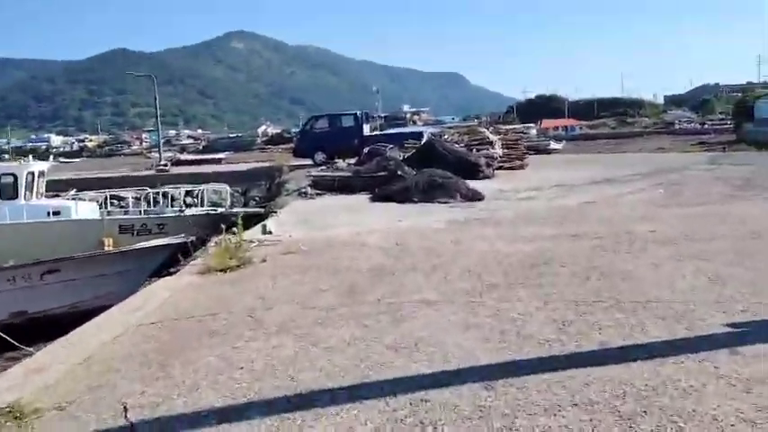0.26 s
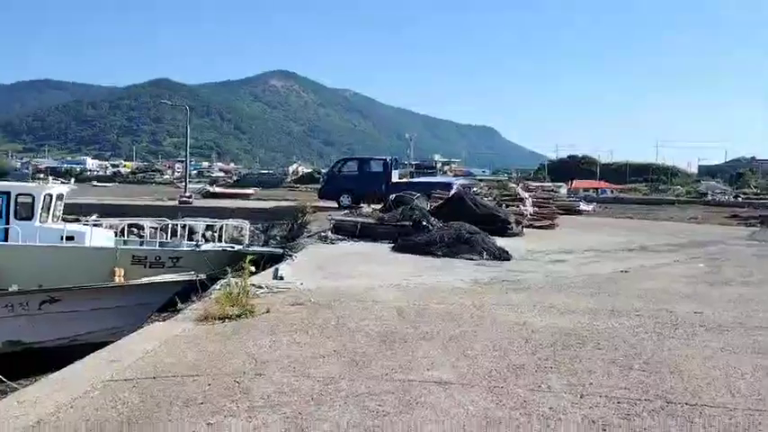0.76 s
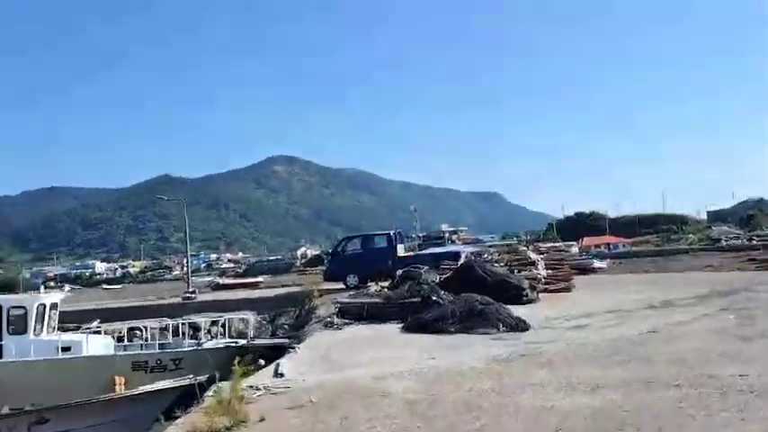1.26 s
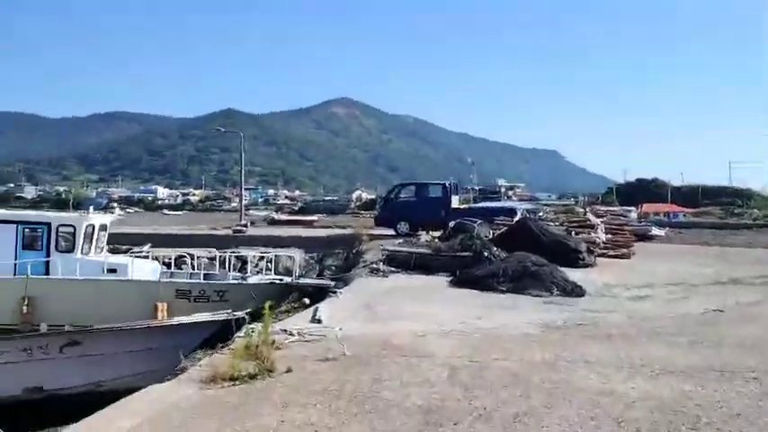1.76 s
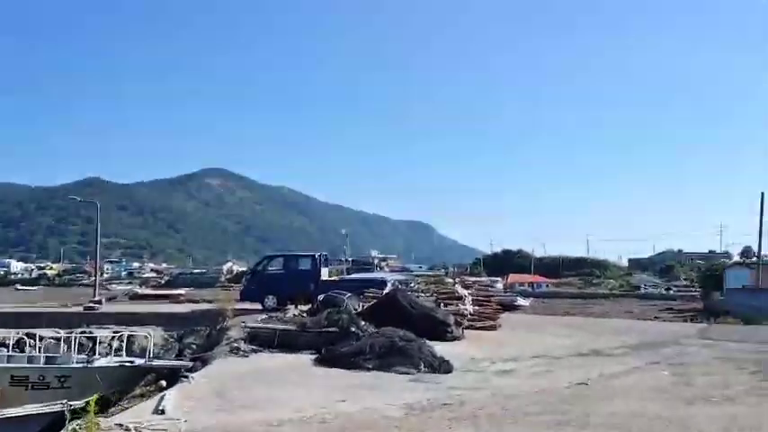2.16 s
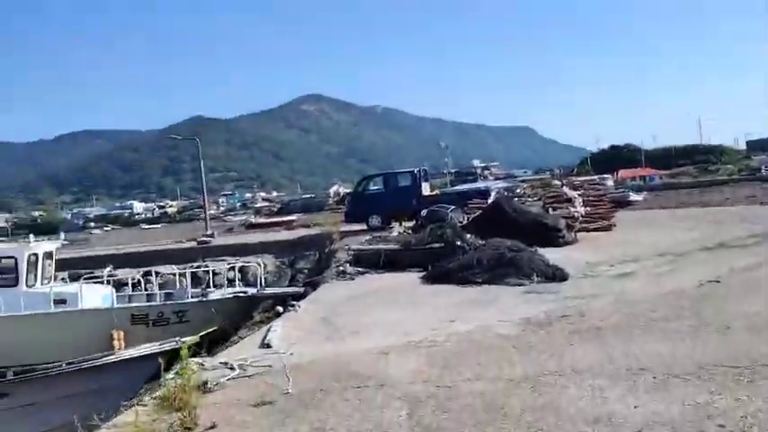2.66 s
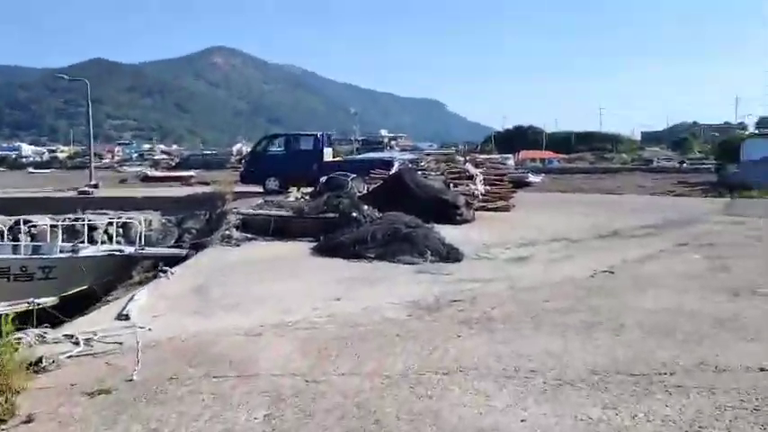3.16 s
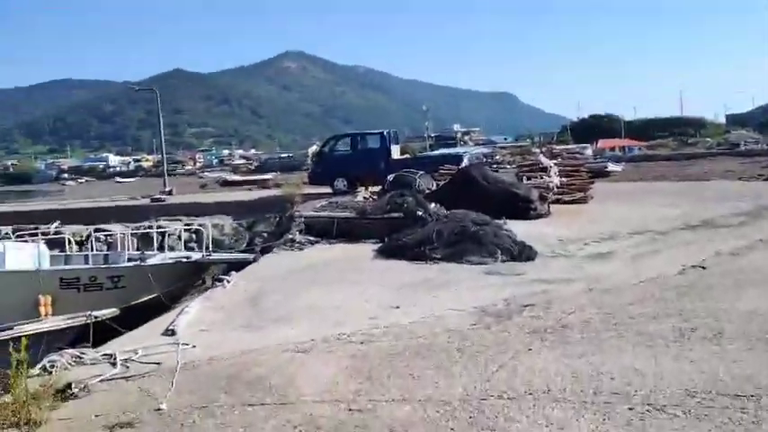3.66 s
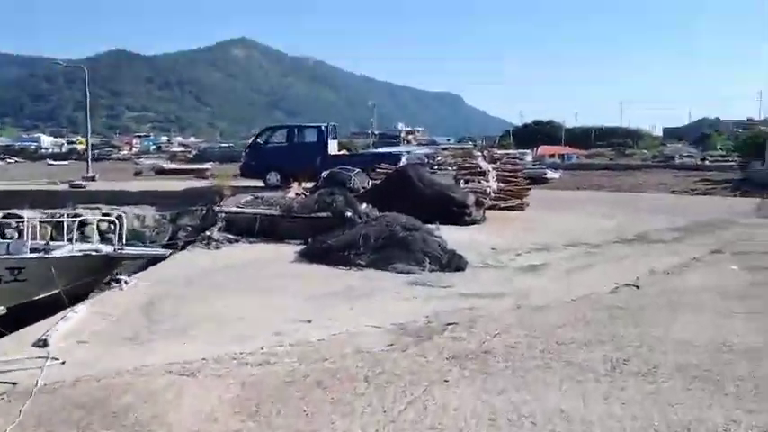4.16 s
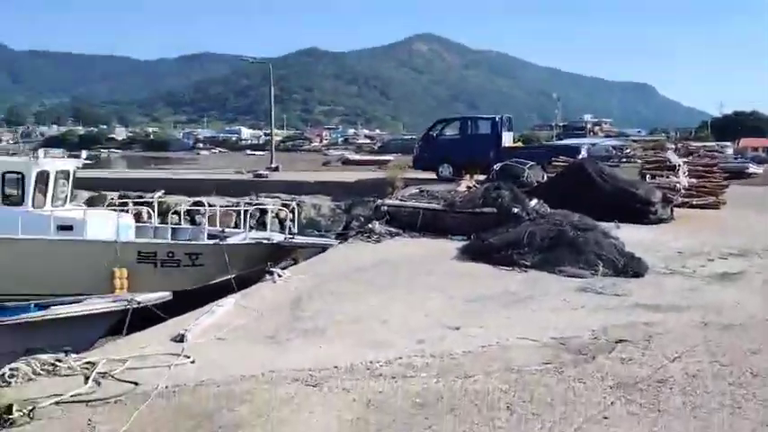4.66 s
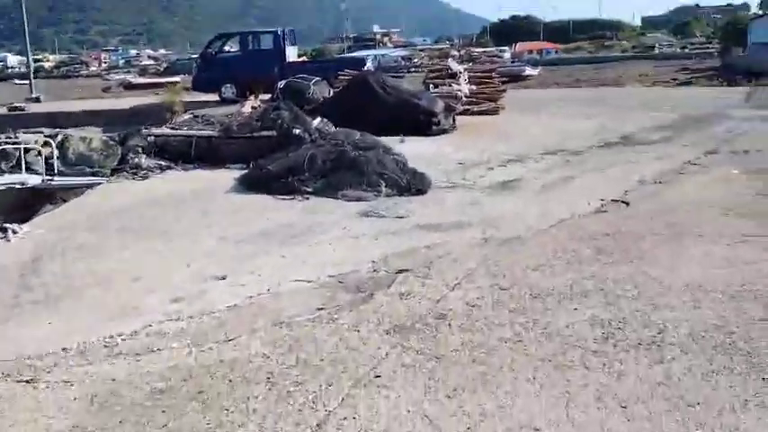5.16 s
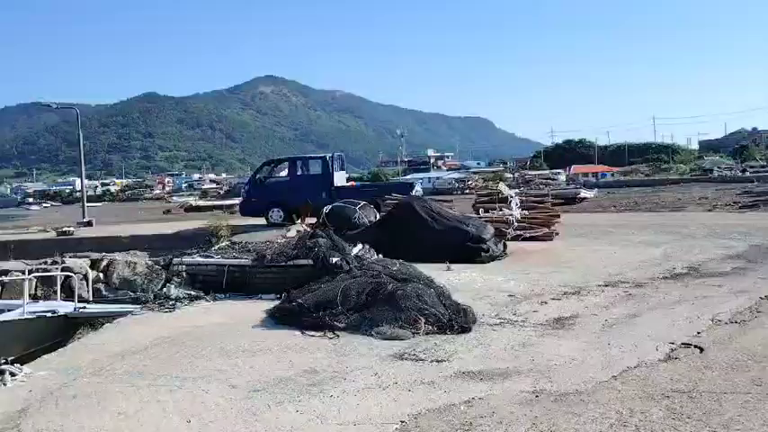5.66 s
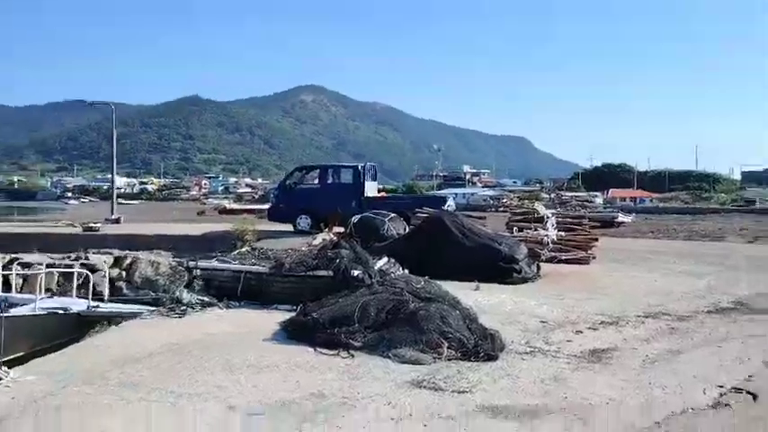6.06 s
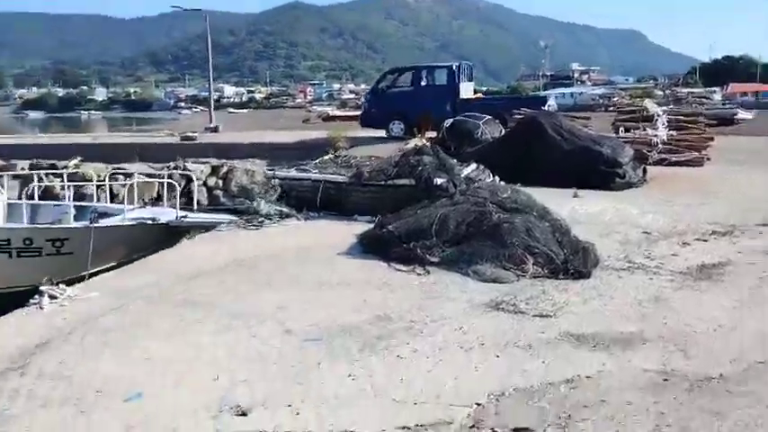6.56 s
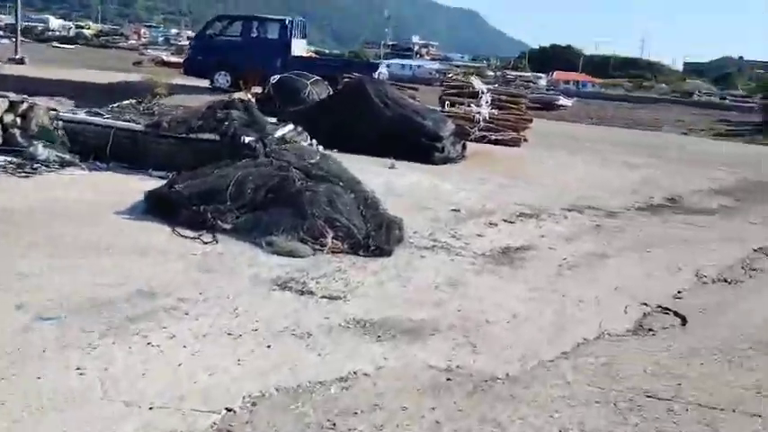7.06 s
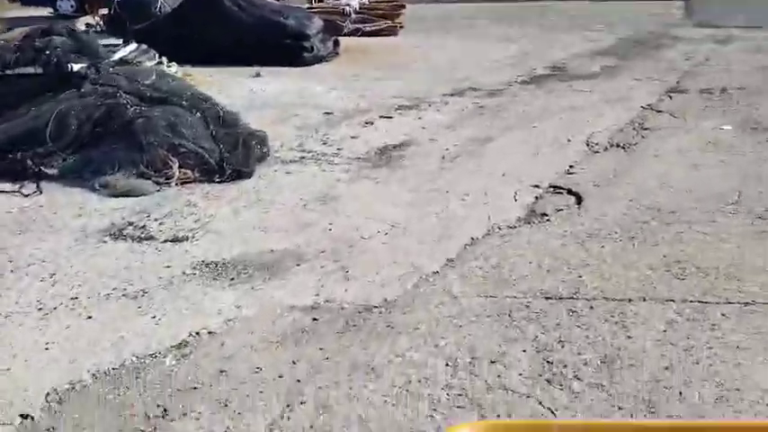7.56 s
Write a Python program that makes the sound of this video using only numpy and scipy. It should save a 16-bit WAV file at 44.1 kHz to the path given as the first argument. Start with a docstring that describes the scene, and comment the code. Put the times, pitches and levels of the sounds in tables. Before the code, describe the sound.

A plastic-tub wheelbarrow rumbles over rough concrete outdoors, its hollow tub drumming low while the frame and loose steel parts knock, rattle and clink irregularly.

```python
"""A plastic-tub wheelbarrow on rough concrete, just below a hand-held phone: the wheel shakes the tub,
whose modes drum low; each bounce booms at its own low pitch. Frame and loose steel parts chatter and
knock as shaped noise, and each knock adds short hollow rings. The axle squeaks very high now and then as
hiss with arching whistles; two sharp noise ticks fall near the end. Outdoor hiss and air rumble are faint."""
import sys
import numpy as np
from scipy import signal
from scipy.fft import rfft, irfft, next_fast_len
from scipy.io import wavfile
from scipy.ndimage import uniform_filter1d, map_coordinates

SR = 44100
rng = np.random.default_rng(int(sys.argv[2]) if len(sys.argv) > 2 else 0)


def wav_record(signal):
    """Record a signal, one row per channel, as 16-bit PCM in the file named by sys.argv[1]."""
    frames = np.transpose(np.atleast_2d(signal))
    bounded = np.clip(frames, -1, 1)
    # unit amplitude maps onto the largest positive 16-bit level
    quanta = np.round(bounded * 32767).astype(np.int16)
    wavfile.write(sys.argv[1], SR, quanta)


def rack_gain(trim_db):
    """Turn a fader trim in dB into the linear factor to multiply a signal by."""
    fader = np.asarray(trim_db, float)
    return 10 ** (fader / 20)


N = 343980


def unit(x):
    """Scales to rms 1."""
    return x / np.sqrt(np.mean(x ** 2) + 1e-20)


def along(points, hz):
    """Interpolates (hz, value) points on a log-frequency axis."""
    points_hz, values = np.transpose(points)
    return np.interp(np.log(hz + 1), np.log(points_hz + 1), values)


def wobble(rate_hz):
    """Smooth random curve, rate_hz knots a second."""
    knots = rng.standard_normal(int(N * rate_hz / SR) + 4)
    return map_coordinates(knots, [np.arange(N) * rate_hz / SR])


def filtered(x, response):
    """Applies a complex frequency response."""
    size = next_fast_len(N + 8192)
    return irfft(rfft(x, size) * response(np.fft.rfftfreq(size, 1 / SR)), size)[..., :N]


def noise(spectrum):
    """Two unrelated smooth noises, joint rms 1, with this colour."""
    return unit(filtered(rng.standard_normal((2, N)), lambda hz: rack_gain(along(spectrum, hz))))


def patchy(spectrum, patchy_db):
    """Two unrelated coloured noises; patches of pitch swell and fade as different parts ring."""
    white = rng.standard_normal((2, N), dtype=np.float32)
    hz, _, z = signal.stft(white, SR, nperseg=512)
    field = uniform_filter1d(rng.standard_normal(z.shape[1:]), size=3, axis=0)
    field = uniform_filter1d(field, size=5, axis=1)
    gain_db = along(spectrum, hz)[:, None] + patchy_db * unit(field)
    return unit(signal.istft(z * rack_gain(gain_db), nperseg=512)[1][:, :N])


def jolts(rate_hz, spread_db, t60_s, rise_s):
    """Envelope of rms 1: small random contacts that swell and die fast, a few far stronger."""
    strength_db = spread_db * np.minimum(rng.exponential(size=N), 4)
    kicks = (rng.random(N) < rate_hz / SR) * rack_gain(strength_db) ** 2
    power = signal.lfilter([1], [1, -rack_gain(-120 / (t60_s * SR))], kicks)
    return unit(np.sqrt(np.abs(uniform_filter1d(power, round(rise_s * SR) + 1)) + 1e-9))


def blows(times_s, levels_db, t60_s, attack_s, crack_db):
    """Envelope of many blows: fast rise, short crack, rattle that holds then falls; powers add."""
    power, t = np.zeros(N + SR), np.arange(SR // 3) / SR
    rattle = rack_gain(-60 * (t / t60_s) ** 1.54) ** 2
    crack = rack_gain(crack_db - 60 * t / 0.049) ** 2
    shape = (1 - np.exp(-t / attack_s)) ** 2 * (rattle + crack)
    for start_s, level_db in zip(times_s, levels_db):
        power[round(start_s * SR):][:len(t)] += rack_gain(level_db) ** 2 * shape
    return np.sqrt(power[:N])


def low_cut(hz):
    """Keeps deep bass out of the tub sounds: fourth-order slope below 85 Hz."""
    return (1j * hz / 85) ** 4 / (1 + (hz / 85) ** 8) ** .5


def outdoors():
    """Faint outdoor hiss, uneven over pitch and time."""
    spectrum = [(200, -56.5), (500, 15), (2500, -12.5), (4000, -36), (7500, 0), (9000, -44), (11000, -82)]
    return rack_gain(-56.5) * patchy(spectrum, patchy_db=11.0)


# low air rumble: hz, density_db (dB per Hz)
AIR = [(12, -28), (22, -10.5), (55, -13.5), (70, 1), (90, -41.5)]


def air(shudder):
    """Low air rumble that follows the shuddering tub, with a slow random level."""
    return rack_gain(-64 + 2.5 * wobble(7)) * shudder * noise(AIR)


# snaps of grit: start_s, level_db (relative)
TICKS = [(7.6001, -17.5), (7.6893, -10.5)]


def ticks():
    """A grain of grit snaps: a noise burst, wide in pitch, that falls 60 dB in 4.6 ms."""
    burst, t = np.zeros(N + SR), np.arange(SR // 50) / SR
    for start_s, level_db in TICKS:
        burst[round(start_s * SR):][:len(t)] += rack_gain(level_db - 3.5 - 60 * t / 0.0046)
    return burst[:N] * noise([(800, -49), (2000, 7), (8000, 4.5), (13000, -14), (16000, -10.5)])


# axle squeaks: start_s, length_s, level_db
SQUEAKS = [(0.345, 0.035, -81), (3.772, 0.2, -53.5), (4.004, 0.041, -56), (4.428, 0.12, -55),
           (5.366, 0.15, -58), (5.574, 0.039, -54), (7.168, .055, -61), (7.734, 0.059, -60)]


def squeaks():
    """Dry axle: a hiss that swells, with thin whistles that arch up and down in it."""
    swell, whistles = np.zeros(N + SR), np.zeros((2, N + SR))
    for (start_s, length_s, level_db), draws in zip(SQUEAKS, rng.random((len(SQUEAKS), 8, 3))):
        u = np.linspace(0, 1, round(length_s * SR))
        start, shape = round(start_s * SR), rack_gain(level_db) * np.sin(np.pi * u) ** 0.85
        arch = 1 - 0.87 * (u - .3 - .4 * draws[:, 1:2]) ** 2
        hz = (12000 + 2800 * draws[:, :1]) * arch
        gate = np.exp(-((u - .3 - .5 * draws[:, 2:]) / 0.11) ** 2)
        tones = gate * np.sin(2 * np.pi * np.cumsum(hz, axis=1) / SR)
        pair = [tones[::2].sum(axis=0), tones[1::2].sum(axis=0)]
        swell[start:][:len(u)] += shape
        whistles[:, start:][:, :len(u)] += rack_gain(-1) * shape * pair
    hiss = noise([(8500, -37), (10500, -4.5), (13500, 1.5), (15300, -1), (16200, -39.5)])
    return swell[:N] * hiss + whistles[:, :N]


def rolling(dips, swing_db, base_db, follows, after):
    """Level of rolling chatter: a share of the ground's swing, plus the rattle after blows."""
    return dips * np.hypot(rack_gain(base_db + follows * swing_db), after)


RATTLE_DB, RATTLE_T60_S = -15.5, 0.14  # loose parts rattle on after a blow; dB relative to it
# loose steel blows: start_s, level_db (relative), sizzle_db (re level_db)
CLINKS = [(0.068, -35, -29), (0.156, -17.5, -23), (0.3506, -19, -46), (0.4075, -52, -35), (0.629, -42, -27),
          (0.7008, -23, -21), (0.74, -34, -19), (0.7726, -40, -35), (0.8255, -48, -32), (1.073, -28.5, -36),
          (1.1034, -29, -22), (1.1199, -21, -32), (1.174, -28, -21), (1.2361, -37, -26), (1.4217, -36, -25),
          (1.4426, -31.5, -24), (1.529, -35, -29), (1.6157, -46, -33), (1.6611, -45, -44),
          (1.7065, -47, -41), (1.7579, -39, -18), (1.8477, -40, -44), (2.1844, -41, -34),
          (2.2114, -36, -35), (2.256, -33.5, -33), (2.2857, -43, -32), (2.301, -30, -35),
          (2.3965, -25.5, -39), (2.4328, -20.5, -27), (2.4916, -23, -19.5), (2.541, -49, -24),
          (2.5775, -36, -18), (2.598, -32, -22), (2.666, -37, -35), (2.6923, -31, -27), (2.731, -35, -35),
          (2.7472, -27, -20), (2.82, -38, -22), (2.888, -34, -26), (2.9597, -39, -22), (2.9831, -34, -27),
          (3.0225, -35, -26), (3.0405, -26.5, -32), (3.0999, -28, -27), (3.1276, -29, -18),
          (3.1552, -43, -23), (3.1692, -31, -21), (3.1921, -26, -19), (3.267, -20, -18.5),
          (3.3129, -37, -25), (3.3424, -31, -33), (3.4032, -29.5, -23), (3.4288, -15.5, -23),
          (3.474, -28, -33), (3.576, -32, -32), (3.712, -47, -33), (3.7194, -39, -27), (3.798, -33.5, -34),
          (3.8671, -34.5, -25), (3.881, -31, -28), (3.9916, -36, -22), (4.115, -35, -31), (4.134, -27, -28),
          (4.179, -25, -24), (4.2003, -23, -24), (4.2525, -36, -12), (4.2677, -21.5, -17),
          (4.3206, -30, -21), (4.353, -24.5, -32), (4.394, -21.5, -17), (4.475, -25.5, -30),
          (4.5237, -29.5, -20), (4.6069, -46, -36), (4.6284, -25.5, -36), (4.667, -30, -35),
          (4.6838, -28, -34), (4.7446, -35, -29), (4.7596, -27, -27), (4.782, -26.5, -24),
          (4.82, -25.5, -25), (4.884, -24.5, -21), (4.9873, -35, -32), (5.0315, -20, -40),
          (5.1153, -37, -33), (5.2071, -42, -39), (5.3084, -23.5, -31), (5.394, -34.5, -24),
          (5.4515, -24, -25), (5.5355, -19, -32), (5.5697, -25, -26), (5.6198, -25, -21), (5.643, -36, -19),
          (5.661, -31, -21), (5.694, -30.5, -25), (5.8192, -18.5, -19), (5.8213, -18.5, -25),
          (5.8895, -27.5, -27), (5.956, -33, -23), (5.9738, -20, -24), (6.007, -28, -21),
          (6.0681, -27, -26), (6.0916, -27.5, -21), (6.1409, -48, -35), (6.1515, -45, -35),
          (6.2413, -15, -19), (6.2916, -23, -23), (6.3365, -23.5, -26), (6.4023, -47, -22),
          (6.4375, -22.5, -29), (6.5031, -35, -34), (6.533, -28, -22), (6.5503, -18.5, -25),
          (6.6343, -21, -22), (6.7096, -26, -24), (6.7766, -33.5, -34), (6.8009, -32.5, -36),
          (7.065, -38, -26), (7.1302, -49, -30), (7.4066, -35, -24), (7.4752, -23.5, -35),
          (7.5328, -37, -20), (7.6016, -44, -13), (7.6226, -32, -17), (7.661, -31, -17), (7.6863, -39, -14)]


def clinks():
    """Envelopes of the steel clinks, of their sizzle and of the tinkle and pings that follow."""
    start_s, level_db, sizzle_db = np.transpose(CLINKS)
    sizzle_db = level_db + sizzle_db
    return (blows(start_s, level_db - 8.5, 0.043, 0.0012, crack_db=5.0),
            blows(start_s, sizzle_db - 3.5, 0.033, 0.0025, crack_db=8.5),
            blows(start_s, level_db + RATTLE_DB + 3.0, RATTLE_T60_S, 0.0042, crack_db=-19),
            blows(start_s, sizzle_db - 10.5, RATTLE_T60_S, 0.012, crack_db=-30))


# brightest steel: hz, density_db (dB per Hz)
SIZZLE = [(5000, -95.5), (7000, -36), (8800, 2), (10300, -1), (13400, -8), (15300, -11), (16300, -92)]


def sizzle(roll, pings, hit):
    """Bright steel noise: rises faster than the rolling; after a clink, single contacts ping."""
    return np.hypot(rack_gain(-7.5) * roll ** 1.5 + pings, hit) * patchy(SIZZLE, patchy_db=2.5)


# loose steel: hz, density_db (dB per Hz)
STEEL = [(2120, -13.5), (3600, -6), (3890, -15.5), (4590, -4.5), (5500, 1.5), (6340, -3.5), (7070, -1),
         (8210, -6), (9200, -22.5), (12000, -72), (20200, -120)]


def steel(roll, hit):
    """Loose steel: patchy noise under the combined power of tinkle and clinks."""
    return np.hypot(roll, hit) * patchy(STEEL, patchy_db=4.0)


# bumps: start_s, knock_db (relative), thud_db (re knock_db), ring_hz, ring_db (re knock_db)
KNOCKS = [(0.0638, -27.5, -6, 1900, -3.5), (0.155, -9, -7, 2110, -7), (0.2862, -34.5, 0, 1330, -1),
          (0.353, -19, -9.5, 1210, -7), (0.4134, -28, -5, 1220, -1), (0.6265, -26.5, -24, 1720, -2.5),
          (0.701, -13.5, -9.5, 1010, -16), (0.7402, -17, -9, 1140, -3), (0.817, -25.5, -4, 1760, -2),
          (1.0742, -28.5, -9, 2210, -7.5), (1.095, -24.5, -12, 1340, -7), (1.1033, -18, -6, 1660, -8.5),
          (1.1166, -21, -3.5, 1650, -4), (1.1752, -17.5, -12, 1140, -5), (1.236, -27, -15, 1330, -4),
          (1.358, -22, -7, 1060, -15), (1.4263, -14.5, -8.5, 1070, -9), (1.4837, -25.5, -1.5, 1250, -5),
          (1.5768, -33.5, -18, 1060, 0), (1.6433, -31, -18, 1230, 2), (1.7664, -37.5, -2, 1680, -19),
          (1.8333, -26, -15, 1160, -5), (2.0886, -49, -5, 1700, -7), (2.1865, -26, -7, 2280, -11),
          (2.2568, -26, -15, 2100, -10), (2.291, -24, -1.5, 1390, -3), (2.301, -24.5, -19, 2100, -6),
          (2.393, -20, -21, 1320, -8), (2.4057, -18.5, -22, 1510, -6), (2.4318, -11, -19, 1420, -13),
          (2.4485, -22.5, -21, 1115, -2), (2.4788, -13.5, -9, 2150, -12.5), (2.4917, -12, -13, 1020, -10),
          (2.5426, -34, -7, 1340, -7), (2.579, -30, -2, 1920, -12), (2.668, -19, -20, 1580, -6.5),
          (2.7288, -20, -4.5, 1120, -4), (2.753, -18.5, -17, 1075, -10), (2.817, -34, 6.5, 1880, -11),
          (2.8328, -26.5, -6, 1710, -1), (2.8853, -23.5, -3, 2300, -8.5), (2.9673, -25, -1.5, 1070, -6),
          (3.02, -17.5, -6, 1360, -20), (3.039, -16.5, -24, 1290, -11), (3.084, -28, -23, 1320, -10),
          (3.0984, -18, -3, 2160, -5.5), (3.1285, -18.5, -5.5, 1210, 1), (3.1567, -17, -2, 1225, -9),
          (3.1906, -11.5, -11.5, 1070, -7), (3.237, -21.5, -3.5, 1170, -7), (3.27, -12.5, -7, 2350, -10.5),
          (3.339, -19.5, -9, 1290, -10), (3.401, -23, -1, 1710, -15), (3.4274, -14, -9, 2640, -13.5),
          (3.475, -15.5, -7.5, 1360, -14), (3.5144, -26, -16, 2400, -9), (3.5372, -40, -10, 1070, -7),
          (3.5783, -26.5, -13, 1300, -2), (3.707, -24, -10, 1240, -3), (3.7945, -23, -3, 1430, 1.5),
          (3.9973, -23.5, -11, 1170, -8), (4.0544, -28.5, -12.5, 1330, -2), (4.1226, -14, -8.5, 1330, -8.5),
          (4.1864, -10.5, -10.5, 1270, -11), (4.2218, -15, -17, 1030, -8), (4.257, -16.5, -3, 1970, -11),
          (4.2722, -9, -31, 1180, -7), (4.338, -32, -10, 1070, -7), (4.355, -17.5, -10, 2050, -6),
          (4.4223, -27.5, -19, 2010, -3), (4.4834, -18, -11.5, 1880, -8), (4.5207, -21, -8.5, 1006, -7),
          (4.6109, -30, -8, 1295, -7), (4.6266, -23.5, -8.5, 1820, -8.5), (4.6745, -15, -17, 1375, -18),
          (4.7577, -16.5, -14.5, 1820, -5), (4.8045, -22.5, -31, 1560, -10),
          (4.826, -12.5, -30, 1590, -4.5), (4.8333, -21, -22, 1690, -2), (4.8783, -16, -13, 1860, -9),
          (4.9338, -18.5, -17, 1230, -9), (4.9494, -25.5, -17, 1760, -7), (5.0333, -17, -36, 1930, -10),
          (5.0644, -24, -29, 1070, -3), (5.1193, -21, -5, 1080, -9), (5.251, -26, -10, 1190, -7),
          (5.293, -42, -8, 1300, -2), (5.309, -15.5, -12.5, 1760, -10.5), (5.3717, -21.5, -8.5, 1180, -11),
          (5.423, -29.5, -6, 1340, 0), (5.4495, -12.5, -14.5, 2100, -8.5), (5.5378, -15, -8, 1850, -5),
          (5.5705, -19.5, -6, 1730, -14), (5.6271, -12, -9, 1340, -11), (5.647, -16.5, -18, 1090, -3),
          (5.6915, -23.5, -6, 1330, -3), (5.7915, -30.5, 4, 1710, -7), (5.8182, -21, 0, 2590, -17),
          (5.8316, -17.5, -11.5, 1280, -4.5), (5.8903, -20, -9, 1250, 1), (5.9233, -20.5, -9, 1090, -5),
          (5.9703, -18.5, -8.5, 1370, -7), (6.012, -17.5, -7, 1280, -3), (6.0688, -16.5, -7, 1080, -4),
          (6.0957, -18.5, -9, 1080, -3), (6.2431, -15, -5.5, 1800, -12), (6.2976, -15, -11, 1010, -13),
          (6.4392, -17.5, -7, 1290, -6), (6.5313, -11.5, -5, 1510, -10), (6.551, -12, -17, 1370, -7),
          (6.58, -23.5, -7.5, 1750, -3), (6.6109, -19, -3, 2650, -15), (6.637, -11.5, -21, 1983, -15.5),
          (6.7052, -19, -1, 1340, -5), (6.7797, -22, -12.5, 1060, -4), (6.8014, -17.5, -11.5, 1130, -12),
          (7.3726, -34, -8, 1260, -3), (7.4094, -28, -3, 1370, -1), (7.4749, -19, -6.5, 1290, -3),
          (7.5333, -26.5, -1, 1270, 1), (7.5996, -37, -13, 2260, -5), (7.6258, -19, -1.5, 1190, -7),
          (7.665, -25.5, -3, 1100, -2), (7.6857, -28.5, 0.5, 1210, -7)]


def knocks():
    """Envelopes of the knocks: upper frame, low thud and the rattle that follows."""
    start_s, knock_db, thud_db, _, _ = np.transpose(KNOCKS)
    return (blows(start_s, knock_db - 12.5, 0.079, 0.00027, crack_db=1.5),
            blows(start_s, knock_db + thud_db - 6.5, 0.22, 0.011, crack_db=-13.5),
            blows(start_s, knock_db + RATTLE_DB, RATTLE_T60_S, 0.0041, crack_db=-33))


# tub wall modes: mode_hz, level_db
PANEL = [(960, -15.5), (1070, -2.5), (1130, -16), (1240, -8.5), (1330, -3), (1440, -7.5), (1600, -2),
         (1690, 1), (1820, -4), (1960, -3.5), (2060, 0), (2180, -4), (2380, 2), (2620, 6), (2850, 2)]


def rings():
    """Every knock leaves a short hollow ring: wall modes near its pitch, each slightly detuned at random."""
    spread, detune, t60_s = .13, 0.024, 0.09  # log-pitch reach, largest share of pitch
    ring, t = np.zeros((2, N + SR)), np.arange(SR // 10) / SR
    mode_hz, mode_db = np.transpose(PANEL)[..., None]
    for (start_s, knock_db, _, ring_hz, ring_db), draw in zip(KNOCKS, rng.random((len(KNOCKS), 3, len(PANEL), 1))):
        pitch_hz = mode_hz * (1 + detune * (2 * draw[0] - 1))
        weight = rack_gain(mode_db) * np.exp(-(np.log(mode_hz / ring_hz) / spread) ** 2)
        cluster = weight * np.sin(2 * np.pi * (pitch_hz * t + draw[1:]))
        shape = (1 - np.exp(-t / 0.00077)) * rack_gain(knock_db + ring_db - 60 * t / t60_s)
        ring[:, round(start_s * SR):][:, :len(t)] += shape * cluster.sum(axis=1)
    return ring[:, :N]


# low frame thud: hz, density_db (dB per Hz)
BODY = [(150, -81.5), (300, -20), (450, -8.5), (640, 2.5), (900, -8.5), (1300, -21.5), (3000, -88.5)]


def thud(hit):
    """Low frame thud: patchy noise under the thud envelope."""
    return hit * patchy(BODY, patchy_db=-2.5)


# frame: hz, density_db (dB per Hz)
FRAME = [(240, -46), (400, 4), (519, -10.5), (641, -22.5), (699, -6.5), (971, -5), (1330, -3), (1530, -9),
         (1730, -6), (2720, -12), (3080, -16.5), (4000, -20.5), (5200, -21), (8800, -120)]


def frame(roll, hit):
    """Frame: patchy noise under the combined power of chatter and knocks."""
    return np.hypot(roll, hit) * patchy(FRAME, patchy_db=2.0)


# shaking from the ground: time_s, level_db
ROLL = [(0, -28), (.4, -24.5), (.8, -24), (1.2, -24), (1.6, -27.5), (2.0, -32), (2.5, -21), (2.9, -22.5),
        (3.25, -20.5), (3.6, -23), (4.05, -26.5), (4.249, -21), (4.9, -20), (5.3, -27), (5.7, -20.5),
        (6.6, -20.5), (7.0, -24.5), (7.4, -27), (7.8, -28.5)]


def ground_shaking():
    """Shaking level from the ground in dB, interpolated."""
    return np.interp(np.arange(N) / SR, *np.transpose(ROLL))


# brief changes of the shaking, nearly all dips: middle_s, length_s, change_db
LULLS = [(0.311, 0.058, -4.5), (0.543, 0.17, -9.5), (.99, 0.19, -10.5), (1.312, 0.017, -3.5),
         (1.806, 0.041, -4.5), (2.142, 0.1, -3), (2.382, 0.049, -7), (2.567, 0.027, -3.5),
         (2.651, 0.033, -2), (2.805, 0.044, -3.5), (2.873, 0.015, -6), (3.008, 0.022, -4.5),
         (3.07, 0.014, -9.5), (3.385, 0.02, -1.5), (3.664, 0.059, -6.5), (4.059, 0.026, -2),
         (4.34, 0.038, -4), (4.463, 0.026, -1.5), (4.6, 0.056, -5.5), (4.734, 0.053, -3),
         (4.868, 0.016, -2.5), (5.021, .04, -1), (5.287, 0.046, -2.5), (5.395, 0.025, -3),
         (5.763, 0.12, -4.5), (6.14, 0.051, -3), (6.225, 0.01, 1), (6.392, 0.023, -1.5), (6.43, 0.017, -3),
         (6.503, 0.023, -0.5), (6.623, 0.016, -0.5), (6.945, 0.17, -7), (7.278, 0.19, -5),
         (7.464, 0.12, -3)]


def lulls():
    """Gain of the shaking: it shifts and returns smoothly around each row, nearly always down."""
    middle_s, length_s, change_db = np.transpose(LULLS)[..., None]
    t = np.arange(0, N, 64) / SR
    gain_db = (change_db * np.exp(-(2 * (t - middle_s) / length_s) ** 4)).sum(axis=0)
    return rack_gain(np.interp(np.arange(N) / SR, t, gain_db))


# tub bounces: start_s, level_db (relative), pitch_hz
BOUNCES = [(0.064, -20, 201), (0.155, -8.5, 184.5), (0.198, -10.5, 196), (0.359, -8.5, 143),
           (0.398, -25.5, 164), (0.46, -19, 189.4), (0.626, -14, 136.5), (0.697, -11, 219),
           (0.769, -17, 118), (0.819, -18.5, 144), (0.878, -13, 198), (1.107, -9.5, 176), (1.176, -20, 205),
           (1.354, -9.5, 157.7), (1.434, -9.5, 150), (1.646, -23, 127), (1.839, -5.5, 151.5),
           (2.005, -16, 152), (2.086, -16, 214.7), (2.183, -13.5, 153), (2.308, -14, 128),
           (2.408, -11.5, 221), (2.457, -8, 180), (2.538, -14, 151), (2.689, -5.5, 140.3), (2.89, -14, 237),
           (2.944, -11, 198), (3.033, -7.5, 143), (3.117, -11.5, 135), (3.19, -7.5, 201), (3.267, -9, 220),
           (3.427, -4.5, 193), (3.531, -9, 161), (3.608, -20, 178), (3.727, -8, 159), (3.793, -14.5, 153),
           (4.145, -5, 162), (4.198, -11.5, 148), (4.277, -25, 199), (4.419, -11.5, 148),
           (4.52, -12.5, 185), (4.678, -10, 194), (4.756, -8.5, 145), (4.895, -14, 157), (5.038, -11, 144),
           (5.111, -12.5, 127), (5.317, -21, 161), (5.449, -8, 195.6), (5.562, -10, 170.3),
           (5.629, -11, 205), (5.681, -12, 205), (5.819, -10, 134.4), (5.887, -14.5, 115),
           (5.968, -11, 160), (6.078, -11.5, 157), (6.161, -11, 152.5), (6.245, -17, 127),
           (6.309, -12.5, 195), (6.444, -9, 147), (6.53, -10.5, 223), (6.598, -6, 148), (6.64, -10, 192),
           (6.696, -15, 244), (6.798, -14, 236), (7.027, -12.5, 156), (7.094, -10, 159), (7.371, -10, 165),
           (7.471, -8.5, 141.4), (7.663, -8, 172)]


def thumps():
    """Each bounce booms at its own low pitch, with a soft start."""
    boom, t = np.zeros(N + SR), np.arange(SR // 4) / SR
    for (start_s, level_db, pitch_hz), phase in zip(BOUNCES, rng.random(len(BOUNCES))):
        shape = (1 - np.exp(-t / 0.0071)) * rack_gain(level_db + 1.5 - 60 * t / 0.11)
        boom[round(start_s * SR):][:len(t)] += shape * np.sin(2 * np.pi * (pitch_hz * t + phase))
    return filtered(boom[:N], low_cut) * [[1], [0]]  # first of the pair that ports() blends


def tub_shudder(contact, shake_db):
    """Tub level: the ground's shaking, plus a shudder that goes on after each bounce."""
    start_s, level_db, _ = np.transpose(BOUNCES)
    after = blows(start_s, level_db - 12, 0.18, 0.005, crack_db=-43)
    return contact * np.hypot(rack_gain(shake_db - 0.5), after)


# tub modes: mode_hz, width_hz, level_db
TUB = [(100.6, 14.1, -6), (125, 27.4, -6), (153.9, 13.76, -0.5), (184.1, 29.3, -4), (205, 25.3, -1.5),
       (252.7, 33.9, -7.5), (295, 47.5, -11), (370.4, 46.8, -14.5), (634.5, 53, -24)]


def tub_modes(hz):
    """Sum of resonances in alternating polarity."""
    total = 0
    for k, (mode_hz, width_hz, level_db) in enumerate(TUB):
        damping = 1j * hz * width_hz
        total = total + (-1) ** k * rack_gain(level_db) * damping / (mode_hz ** 2 - hz ** 2 + damping)
    return total


def tub(level, drive):
    """The rough ground shakes the tub through the wheel; its modes drum."""
    ring = filtered(drive * rng.standard_normal((2, N)), lambda hz: tub_modes(hz) * low_cut(hz))
    # partly levelled: loudness follows the ground, not the beats
    beats = np.sqrt(np.abs(uniform_filter1d(ring[0] ** 2, size=2200)) + 1e-9)
    return level * unit(ring / beats ** 0.53)


# left-right likeness: hz, likeness
ALIKE = [(30, .8), (70, .985), (170, .997), (350, .99), (700, .93), (1200, .76), (1900, .45), (2300, .25),
         (3700, .2), (5000, .4), (8000, .15), (15000, .15)]
# left lag: hz, lag_rad
LAG = [(100, .05), (340, .12), (520, .3), (1000, 1.0), (1500, 1.5), (2100, 1.2), (2600, 0), (3200, -1.5),
       (4800, -3.2), (8000, -3.3)]
# left minus right: hz, lean_db
LEAN = [(100, -0.5), (300, 0.1), (900, 0.3), (1200, -1.5), (1800, -8), (2700, -6.5), (4200, 5.5),
        (5000, 1.5), (7000, 6.5), (8500, -5), (11000, -5), (14000, 4)]


def ports(pair):
    """Two microphone ports: alike in the bass, a lag and a lean that change with pitch above."""
    def blend(hz):
        angle = np.arccos(np.clip(along(ALIKE, hz), -1, 1)) / 2
        return np.array([np.cos(angle), np.sin(angle)])

    sign = np.array([[1], [-1]])  # left, right

    def offset(hz):
        return rack_gain(sign * along(LEAN, hz) / 2) * np.exp(-.5j * sign * along(LAG, hz))

    mid, side = filtered(pair, blend)
    return filtered(np.array([mid + side, mid - side]), offset)


def scene():
    """One shaking drives tub, frame and steel; chatter and blows share colours, over a faint outdoor hiss."""
    shake_db, contact = ground_shaking(), lulls()
    swing_db = shake_db - shake_db.mean()
    frame_hit, thud_hit, frame_after = knocks()
    steel_hit, sizzle_hit, steel_after, sizzle_after = clinks()
    shudder = tub_shudder(contact, shake_db)

    # the tyre never quite stops grinding; loose steel adds contacts of its own
    chatter = np.hypot(.35, jolts(130, spread_db=3.5, t60_s=0.1, rise_s=0.0021))
    own_contacts = jolts(280, spread_db=8.0, t60_s=0.15, rise_s=.0015)
    tinkle = np.hypot(0.89 * chatter, 0.46 * own_contacts)
    frame_roll = chatter * rolling(contact ** 1.65, swing_db, -37, 0.89, frame_after)
    steel_roll = tinkle * rolling(contact ** 1.6, swing_db, -51.5, 0.71, steel_after)
    pings = contact * sizzle_after * jolts(70, spread_db=4.5, t60_s=.025, rise_s=.0012)
    grit = rack_gain(1.35 * wobble(400))  # each blow is itself a flurry of tiny contacts

    mix = outdoors() + air(shudder) + ticks() + squeaks()
    mix = mix + sizzle(steel_roll, pings, grit * sizzle_hit) + steel(steel_roll, grit * steel_hit)
    mix = mix + rings() + thud(thud_hit) + frame(frame_roll, grit * frame_hit)
    mix = mix + thumps() + tub(shudder, 0.72 + chatter + rack_gain(40.5) * thud_hit)
    return ports(mix)


def low_pass(x):
    """Removes everything above the highest recorded frequency."""
    return signal.sosfilt(signal.butter(12, 16360, fs=SR, output="sos"), x)


def record(dry):
    """The phone rounds off the highest peaks."""
    soft = dry / (1 + np.abs(dry / .85) ** 5) ** (1 / 5)
    return low_pass(soft)


dry = scene()
out = record(dry)
wav_record(out)
```